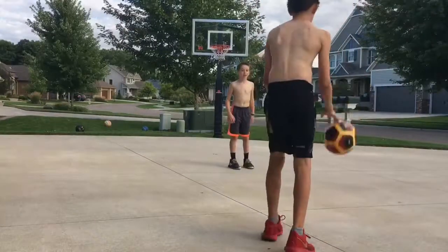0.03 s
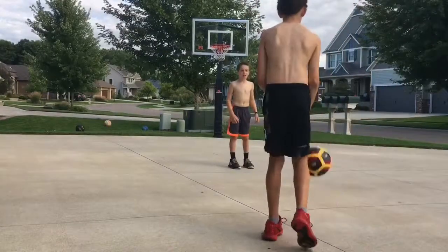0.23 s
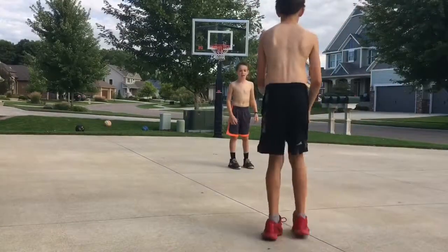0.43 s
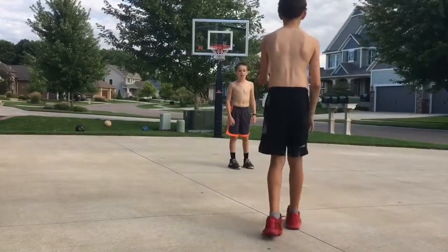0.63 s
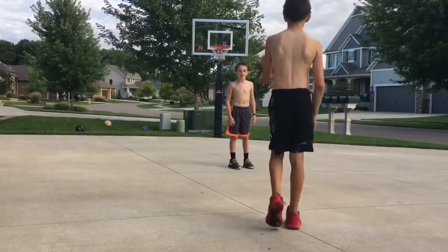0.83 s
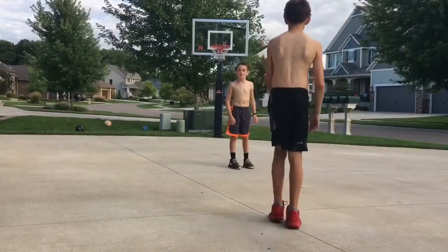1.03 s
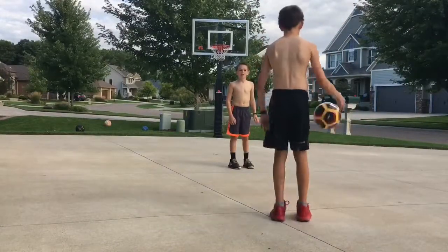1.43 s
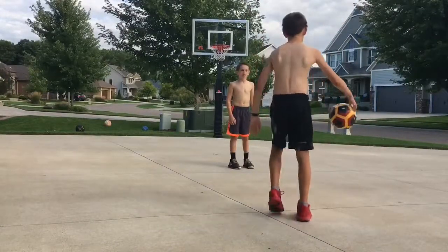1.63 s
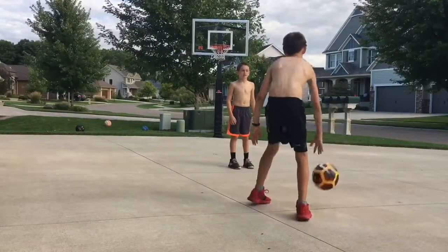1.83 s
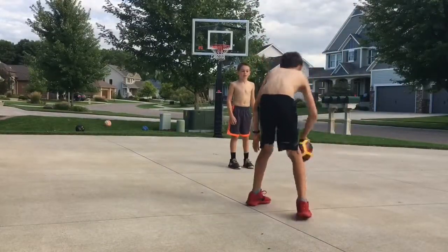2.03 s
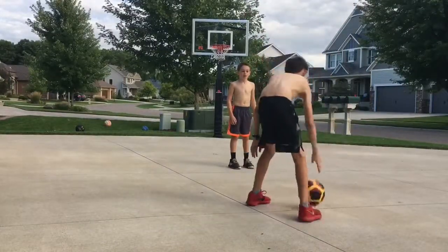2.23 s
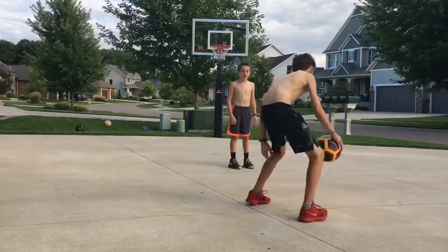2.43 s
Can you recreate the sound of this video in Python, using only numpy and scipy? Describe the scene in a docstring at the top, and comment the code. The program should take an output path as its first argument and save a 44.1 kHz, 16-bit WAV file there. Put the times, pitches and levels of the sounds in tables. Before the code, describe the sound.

A basketball is dribbled on outdoor concrete a few metres away. It bounces at about 0.2 and 1.2 seconds, then quicker at 2.0 and 2.3, each a sharp slap and low thump with a faint echo; the first is loudest. Soft hand brushes and shoe scuffs come between bounces, clearest around 1.1, 1.5 and 2.5 seconds. A quiet suburban rumble continues underneath.

```python
"""Four bounces of a dribbled ball on an outdoor concrete court, a few metres away.
Each is a sharp slap of the skin, a knock of the shell and a low thump of the squeezed ball;
houses and trees send back a faint tail. Hands brush the ball and shoes scuff the concrete
over a quiet suburban rumble."""
import sys
import numpy as np
from scipy import signal
from scipy.fft import rfft, irfft
from scipy.io import wavfile
from scipy.ndimage import uniform_filter1d

SR = 44100
rng = np.random.default_rng(int(sys.argv[2]) if len(sys.argv) > 2 else 0)


def log_audio(samples):
    """Write samples as a 16-bit WAV file to the path given in sys.argv[1]."""
    # one column per channel
    frames = np.atleast_2d(samples).T
    # limit to full scale, then quantise
    limited = np.clip(frames, -1, 1)
    pcm = np.round(limited * 32767).astype(np.int16)
    wavfile.write(sys.argv[1], SR, pcm)


N = 114660
TIME_S = np.arange(N) / SR
FREQ_HZ = np.fft.rfftfreq(N, 1 / SR)


def ball(echo_s=0.052, echo_db=-27, knock_delay_s=0.0011, thump_delay_s=0.0023, tail_colour_share=0.55):
    """Per bounce: slap coloured by the spot that lands, house-front echo, knock, thump, yard tail."""
    # bounces (time [s], slap [dB], thump [dB], knock [dB], spot gain in 6 bands [dB], tail [dB])
    bounces = [(.2350, -3, -9.5, -10, 4, 1.5, 0, -0.5, -1, 1.5, 2),
               (1.2391, -6, -13, -23, 6.5, -3.5, -8.5, -8, 1, -7.5, -0.5),
               (1.9785, -5.5, -14.5, -22.5, -5, -3, 5, -1.5, -1.3, -4.5, -1.5),
               (2.3180, -9.5, -14.5, -25.5, 1.5, -3, -5, 2, -1.5, -1, -4)]
    # spot colour: 0 dB anchor, then hollow, clap, snap, crack, bite, treble (frequency [Hz])
    bands_hz = [500, 860, 1300, 1750, 2200, 3700, 8000]
    # reflection off the nearest house front (frequency [Hz], gain [dB])
    echo_colour = [(100, -2), (800, -2.5), (3000, 1), (6000, -9), (16000, -16)]
    out = np.zeros(N)
    for at_s, slap_db, thump_db, knock_db, *bands_db, tail_db in bounces:
        spot_db = np.array([0, *bands_db])
        slap_colour = list(zip(bands_hz, spot_db))
        tail_colour = list(zip(bands_hz, tail_colour_share * spot_db))
        add(out, at_s, amp(slap_db) * colour(slap(), slap_colour))
        add(out, at_s + echo_s, amp(slap_db + echo_db) * colour(slap(), echo_colour))
        add(out, at_s + knock_delay_s, amp(knock_db) * knock())
        add(out, at_s + thump_delay_s, amp(thump_db) * thump())
        add(out, at_s, amp(tail_db) * colour(yard(), tail_colour))
    return out


def slap(size=8192, tick_db=4.5, skin_cut_hz=760, lift_s=0.0148, lift_width_s=0.003):
    """First touch ticks and rings the skin; grit crackles at touch-down, in contact and at lift-off."""
    # heavily damped skin modes (frequency [Hz], level [dB], t60 [s])
    skin_modes = [(786, -13, 0.015), (1126, -17, .012), (1364, -10.5, .010), (1800, -21, 0.013),
                  (2120, -13.5, 0.019), (3100, -36, 0.015), (3560, -15.5, .007), (3880, -17.5, 0.0087),
                  (6230, -25.5, 0.024), (7580, -15.5, 0.0027), (9640, -16, .007)]
    # grit crushed under the ball (frequency [Hz], level [dB])
    grit_spectrum = [(100, -29), (550, -5), (900, 2), (1400, 2.5), (2200, -3.5), (2700, -7.5), (3800, -1),
                     (4800, -12), (9700, -9.5), (12500, -14.5), (16000, -18)]
    t = TIME_S[:size]
    tick = amp(tick_db) * colour(signal.unit_impulse(size), grit_spectrum)
    # a small patch of skin radiates no bass
    bass_cut = signal.butter(4, skin_cut_hz, "high", fs=SR, output="sos")
    skin = signal.sosfilt(bass_cut, ring(skin_modes, t))
    touch_down = amp(-14) * decay(t, t60_s=0.019)
    contact = amp(-32) * decay(t, t60_s=0.095)
    lift_off = amp(-32) * bump(t, lift_s, lift_width_s)
    grit = (touch_down + contact + lift_off) * noise(grit_spectrum)[:size]
    return grit - skin - tick


def thump(size=24000, start_hz=91.7, sag_hz_per_s=280, peak_s=0.014, width_s=0.009,
          wobble_start_s=0.02134, wobble_rise_s=0.016):
    """The ball squashes and springs back, then wobbles faintly as it rises."""
    # wobble of the ball (frequency [Hz], level [dB], t60 [s])
    wobble_modes = [(95.8, -15.5, 0.31), (71.4, -24.5, 0.59)]
    t = TIME_S[:size]
    cycles = np.cumsum(start_hz - sag_hz_per_s * t) / SR
    squash = bump(t, peak_s, width_s) * np.sin(2 * np.pi * cycles)
    free_s = np.maximum(t - wobble_start_s, 0)
    wobble = np.minimum(free_s / wobble_rise_s, 1) * ring(wobble_modes, free_s)
    return wobble - squash


def knock(size=8192, rise_s=0.0023):
    """The dent spreads and sets the whole shell ringing."""
    # shell modes (frequency [Hz], level [dB], t60 [s])
    shell_modes = [(231, -5, 0.076), (277.4, -3, 0.052), (366, -5, 0.024), (606, -7.5, 0.015)]
    t = TIME_S[:size]
    return np.minimum(t / rise_s, 1) * ring(shell_modes, t)


def rubs(size=6000, width_share=0.44, grain_db=2.5, sand_per_s=380, sand_db=-9.5,
         release_s=0.005, tail_db=-15.5):
    """Friction of hands and soles: a gliding noise band over a broad rasp and ticks of sand."""
    # strokes (time [s], length [s], attack [s], level [dB], band start [Hz], band end [Hz],
    #          rasp re band [dB], level change over the stroke [dB])
    strokes = [(0.069, .007, 0.0015, -60.5, 4000, 3000, 7, -12),
               (0.1132, 0.029, 0.0008, -53, 4400, 3250, 6.5, -16.5),
               (0.662, 0.033, 0.0092, -66, 3000, 2490, 7.5, -8.5),
               (0.885, 0.0085, 0.0027, -75.5, 7300, 3550, 2, 5),
               (1.1245, 0.024, 0.0077, -44, 7050, 4650, -14.5, -7),
               (1.143, 0.053, 0.0056, -48.5, 3830, 2880, -1, -8),
               (1.518, .022, 0.00092, -37.5, 4150, 3240, -12.5, -6.5),
               (1.714, 0.0084, 0.0046, -64.5, 5540, 4500, 7.5, -6),
               (1.912, 0.08, .003, -62, 3470, 2980, 8.5, -23), (2.183, 0.064, 0.02, -56, 3700, 4200, 1, -9),
               (2.246, 0.058, 0.017, -65, 6060, 5400, 11.5, -6),
               (2.482, 0.032, 0.017, -51.5, 3440, 3600, -3, -2.5),
               (2.519, 0.072, 0.014, -49.5, 3680, 3600, 2, -20.5),
               (2.522, 0.032, 0.014, -55, 720, 685, -17, 0)]
    # broad friction noise (frequency [Hz], level [dB])
    rasp_spectrum = [(100, -24), (400, -4), (800, 2), (2200, -3), (4500, -6.5), (9000, -10), (11000, -15.5),
                     (16000, -24)]
    out, t = np.zeros(N), TIME_S[:size]
    for at_s, length_s, attack_s, level_db, start_hz, end_hz, rasp_db, fade_db in strokes:
        progress = np.minimum(t / length_s, 1)
        centre_hz = start_hz + (end_hz - start_hz) * progress
        width_hz = width_share * start_hz
        slips, grain, ticks = rng.standard_normal((3, size))
        band = unit(resonate(resonate(slips, centre_hz, width_hz), centre_hz, width_hz))
        sand = amp(sand_db) * unit(ticks * (rng.random(size) < sand_per_s / SR))
        rasp = amp(rasp_db) * (noise(rasp_spectrum)[:size] + sand)
        envelope = np.minimum(t / attack_s, 1) * np.exp(-np.maximum(t - length_s, 0) / release_s)
        flicker_db = grain_db * unit(uniform_filter1d(grain, size=30))
        gain = amp(level_db + fade_db * progress + flicker_db)
        add(out, at_s, envelope * gain * (band + rasp))
    reflections = signal.fftconvolve(out, unit(yard()) / np.sqrt(N))[:N]
    return out + amp(tail_db) * reflections


def yard(start_s=0.01, rise_s=0.008, wall_s=0.056, wall_spread_s=0.0026, wall_db=3.5):
    """Impulse response of the surroundings, swelling briefly as a house wall answers."""
    # near and far reflections (frequency [Hz], level [dB], t60 [s])
    near = [(30, -32.5, 0.3), (65, -13, 0.92), (110, -17.5, 1), (170, -24, 0.2), (260, -26, 0.42),
            (500, -36.5, .4), (784, -28, .45), (1230, -36, 0.82), (2100, -37.5, 0.73), (3710, -38.5, 0.55),
            (5000, -52.5, 0.69), (8950, -48.5, 0.91), (16000, -69.5, 0.47)]
    far = [(60.1, -40, 1.2), (260, -37, 1.2), (500, -40, 1.2), (800, -42, 1.6), (1800, -46, 0.43),
           (3840, -54.5, 2.3), (4870, -49.5, 0.57), (9200, -58.5, 1.8), (12000, -61, 1.5),
           (16000, -63.5, .8)]
    rise = np.clip((TIME_S - start_s) / rise_s, 0, 1)
    wall_swell = amp(wall_db * bump(TIME_S, wall_s, wall_spread_s))
    return rise * wall_swell * (tail(near) + tail(far))


def tail(bands):
    """Scattered reflections: noise with its own decay time in each band."""
    hz, t, spectra = signal.stft(rng.standard_normal(N), SR, nperseg=512)
    gain = amp(lookup(bands, hz))[:, None]
    t60_s = lookup(bands, hz, column=2)[:, None]
    return signal.istft(spectra * gain * decay(t, t60_s), SR, nperseg=512)[1][:N]


def air(rumble_db=-50.5, swell_db=-0.88, swell_hz=3,
        hum_hz=59.7, hum_spread_hz=1.4, hum_db=-52.5, waver_db=2, waver_hz=9):
    """Distant rumble and hiss, with a low hum wavering in pitch and level."""
    # outdoor background (frequency [Hz], relative density [dB])
    rumble_spectrum = [(20, -29), (40, -9.5), (62, -8.5), (85, -8.5), (120, -10.5), (170, -12), (290, -22),
                       (440, -33), (800, -31.5), (1100, -36.5), (1500, -35), (2500, -42.5), (3600, -46),
                       (4800, -51), (5900, -41.5), (7000, -53), (10000, -56), (16000, -60)]
    cycles = np.cumsum(hum_hz + hum_spread_hz * drift(waver_hz)) / SR
    hum = amp(hum_db + waver_db * drift(waver_hz)) * unit(np.sin(2 * np.pi * cycles))
    rumble = amp(rumble_db + swell_db * drift(swell_hz)) * noise(rumble_spectrum)
    return rumble + hum


def amp(db):
    """Decibels to gain."""
    return 10 ** (np.asarray(db) / 20)


def unit(x):
    """Scale to rms 1."""
    return x / np.sqrt(np.mean(x ** 2) + 1e-20)


def lookup(points, hz, column=1):
    """Interpolate a table column over log frequency."""
    columns = np.transpose(points)
    return np.interp(np.log(hz + 1), np.log(columns[0] + 1), columns[column])


def add(mix, at_s, sound):
    """Mix a sound in, in place."""
    part = mix[max(round(at_s * SR), 0):][:len(sound)]
    part += sound[:len(part)]


def noise(spectrum):
    """Shaped noise, rms 1."""
    return unit(irfft(rfft(rng.standard_normal(N)) * amp(lookup(spectrum, FREQ_HZ)), N))


def drift(rate_hz):
    """Slow random wander, rms 1."""
    return unit(irfft(rfft(rng.standard_normal(N)) * bump(FREQ_HZ, 0, rate_hz), N))


def colour(x, gains, size=4096):
    """Minimum-phase filter through (frequency [Hz], gain [dB]) points."""
    log_gain = np.log(amp(lookup(gains, abs(np.fft.fftfreq(size, 1 / SR)))))
    response = np.exp(np.conj(signal.hilbert(log_gain)))
    taps = np.fft.ifft(response).real[:size // 2]
    return signal.fftconvolve(x, taps)[:len(x)]


def resonate(x, centre_hz, width_hz):
    """Unity-gain resonance following the curve centre_hz."""
    carrier = np.exp(2j * np.pi * np.cumsum(centre_hz) / SR)
    pole = np.exp(-np.pi * width_hz / SR)
    baseband = signal.lfilter([1 - pole], [1, -pole], x / carrier + 1e-18)
    return 2 * (carrier * baseband).real


def ring(modes, t):
    """Sum of decaying sines."""
    return sum(amp(db) * decay(t, t60_s) * np.sin(2 * np.pi * hz * t) for hz, db, t60_s in modes)


def decay(t, t60_s):
    """Fall of 60 dB per t60_s."""
    return np.exp(-np.log(1000) * t / t60_s)


def bump(x, centre, width):
    """Gaussian of peak 1."""
    return np.exp(-((x - centre) / width) ** 2)


def scene():
    """Ball and rubs over the outdoor air, mono."""
    return (ball() + rubs() + air())[None]


def record(dry, low_cut_hz=38, high_cut_hz=15900):
    """Microphone low cut and band limit."""
    highpass = signal.butter(2, low_cut_hz, "high", fs=SR, output="sos")
    lowpass = signal.firwin(255, high_cut_hz, window=("kaiser", 9), fs=SR)
    return signal.oaconvolve(signal.sosfilt(highpass, dry), lowpass[None], "same")


dry = scene()
out = record(dry)
log_audio(out)
```